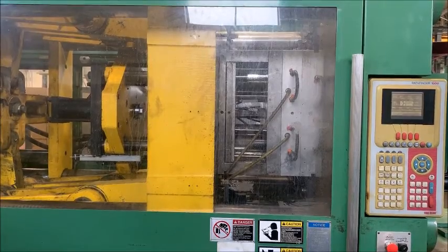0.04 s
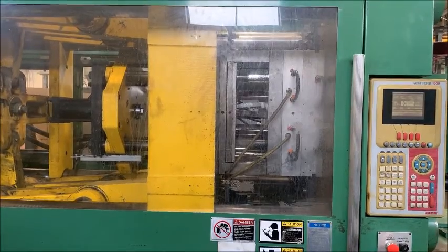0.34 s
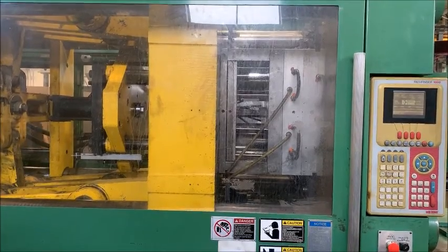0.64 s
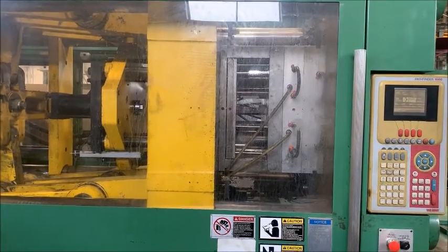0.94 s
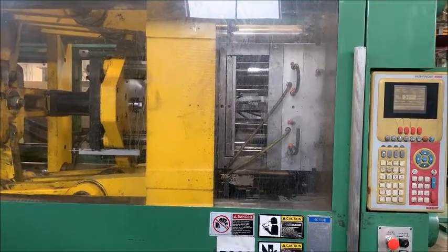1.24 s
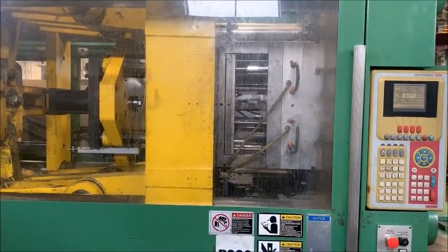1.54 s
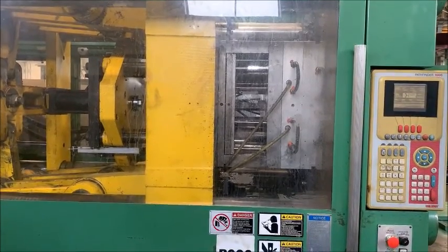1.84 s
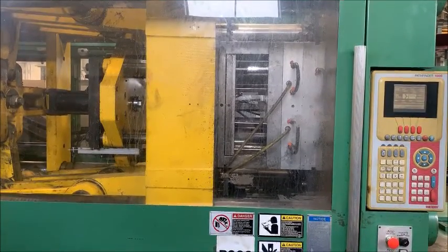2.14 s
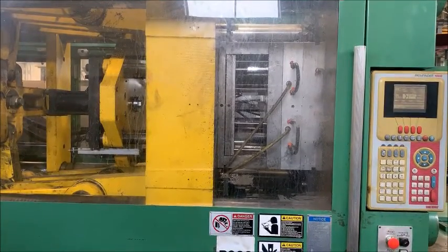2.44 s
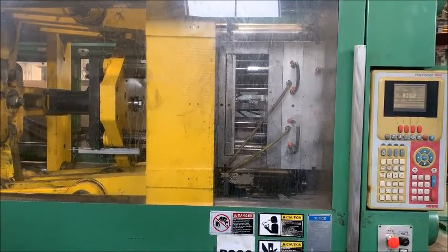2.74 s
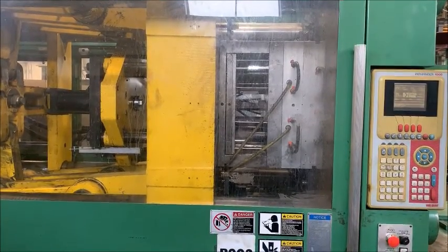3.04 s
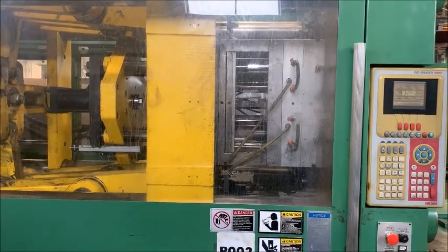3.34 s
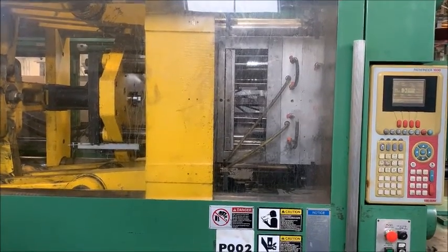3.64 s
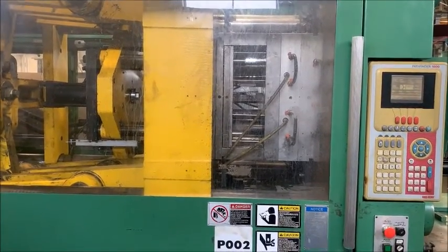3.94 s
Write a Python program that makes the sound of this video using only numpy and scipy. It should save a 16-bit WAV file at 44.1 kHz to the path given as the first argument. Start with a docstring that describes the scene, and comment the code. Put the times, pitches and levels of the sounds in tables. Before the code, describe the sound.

An injection moulding machine drones close by throughout, a low throbbing hum over rushing fans. A thin whistling air leak fades by 2 seconds. Light metal clacks come around 0.8, 2.4 and 3.4 seconds, among short air puffs and brief hollow groans. Faint squeaks and dull thuds sound in the hall near 1.9 seconds. From about 3 seconds a low whine surges, with more thuds towards the end.

```python
"""An injection moulding machine drones in a workshop hall, close to a pair of microphone ports.
Its hydraulic pump and motor beat against each other over a wash of fans and oil flow, while a thin
air leak whistles and dies away. Valves puff through a short tube, slides groan and squeak on narrow
resonances, steel parts clack and ring, and something heavy lands and booms in the hall."""
import sys
import numpy as np
from scipy import signal
from scipy.fft import irfft
from scipy.io import wavfile
from scipy.ndimage import uniform_filter1d

SR = 44100
rng = np.random.default_rng(int(sys.argv[2]) if len(sys.argv) > 2 else 0)


def transcribe(signal):
    """Save signal, clipped to [-1, 1], as a 16-bit WAV file at the path in sys.argv[1]."""
    frames = np.atleast_2d(signal).T
    limited = np.clip(frames, -1, 1)
    pcm = np.round(limited * 32767).astype(np.int16)
    wavfile.write(sys.argv[1], SR, pcm)


N = 176400
T = np.arange(N) / SR
EVENT_T = T[:SR]  # each short sound gets one second


def amp(db):
    """Decibels to gain."""
    return 10 ** (np.asarray(db) / 20)


def unit(x):
    """Scales to rms 1."""
    return x / np.sqrt(np.mean(abs(x) ** 2) + 1e-20)


def colour(points, hz):
    """Reads (Hz, value) points on a log-frequency axis."""
    f, value = np.transpose(points)
    return np.interp(np.log(hz + 1), np.log(f), value)


def level(points):
    """Gain over time from (s, dB) points."""
    return amp(np.interp(T, *np.transpose(points)))


def waver(rate_hz=6.7):
    """A slow random wander of level and phase, complex with rms 1."""
    z = rng.standard_normal(N) + 1j * rng.standard_normal(N)
    return unit(np.fft.ifft(z / (1 + (np.fft.fftfreq(N, 1 / SR) / rate_hz) ** 4)))


# How alike the two microphone ports sound. Each row: frequency in Hz, likeness from 0 to 1.
PORT_LIKENESS = [(60, .98), (130, .9), (280, .78), (550, .3), (1100, .25), (4000, .25), (6500, .5),
                 (8500, .93), (15000, .85)]
# Phase between the ports. Each row: frequency in Hz, lead of the left in radians.
PORT_LEAD = [(20, 0), (480, -.2), (1200, -2.5), (2400, -2.1), (4500, -1.2), (6500, -.6), (8600, -3.14),
             (10400, -6), (11600, -6.6), (13300, -9.4), (15200, -12.5)]

def noise(db_at, size=N):
    """Noise of a given spectrum as the two ports hear it, at rms 1."""
    hz = np.fft.rfftfreq(size, 1 / SR)
    left, other = rng.standard_normal((2, len(hz))) + 1j * rng.standard_normal((2, len(hz)))
    alike = colour(PORT_LIKENESS, hz)
    right = (alike * left + np.sqrt(1 - alike ** 2) * other) * np.exp(-1j * colour(PORT_LEAD, hz))
    return unit(irfft(np.array([left, right]) * amp(db_at(hz)), size))


def tone(hz, db, pan_db, unsteady, phase=None, phase_at_s=.215):
    """One machine tone at the two ports: a steady part and a wavering part."""
    phase = rng.random() if phase is None else phase
    turns, mean_hz = np.cumsum(hz * np.ones(N)) / SR, np.mean(hz)
    carrier = np.exp(2j * np.pi * (turns - np.interp(phase_at_s, T, turns) + phase))
    shared = 1 - .59 * (1 - colour(PORT_LIKENESS, mean_hz))
    drift = np.sqrt(shared) * waver() + np.sqrt(1 - shared) * np.array([waver(), waver()])
    envelope = np.sqrt(1 - unsteady ** 2) + unsteady * drift
    ports = unit(np.array([[amp(pan_db)], [np.exp(-1j * colour(PORT_LEAD, mean_hz))]]))
    return np.sqrt(2) * amp(db) * (ports * envelope * carrier).real


def orders(base_hz, table):
    """Tones at whole multiples of one rate."""
    return sum(tone(round(multiple) * base_hz, *row) for multiple, *row in table)


# Shaft tones. Each row: multiple of the shaft rate (rounded when played), level in dB,
# left over right in dB, unsteadiness from 0 to 1.
PUMP_ORDERS = [(7, -39.5, 30, 0.13), (9, -24.5, 1.5, 0.03), (11, -46.5, -16, 0.7), (14, -40.5, -1, 0),
               (15, -43, 6, 1), (16, -46, 4, 0.06), (18, -33, -2, 0.74), (20, -48, 13, 0.64),
               (24, -34.5, -6.5, 0.73), (36, -41.5, 36, 0.6), (60, -43.5, 22, 0.05), (71.5, -63, 13, 0.3)]
MOTOR_ORDERS = [(1, -34, -1.3, 0.34), (8, -43, 2.4, 0.49)]
# The motor sags under load. Each row: time in seconds, shaft rate in Hz.
MOTOR_SPEED = [(.5, 58.935), (.75, 59.031), (1.9, 59.013), (2.4, 58.963), (2.9, 58.876), (3.2, 59.113),
               (3.55, 59)]
# Swells of the motor tones and of the beating pair. Each row: time in seconds, gain in dB.
MOTOR_SWELL = [(0, 1), (1.4, -1.5), (2.05, 7), (2.6, 1), (3.0, -3), (3.5, 3), (4, 5.5)]
THROB_SWELL = [(0, -0.5), (1.9, -1), (2.4, 2), (2.9, 1), (3.35, -0.5), (4, 1.5)]

def pump_and_motor(pump_hz=19.967):
    """Two shafts drone; two close orders throb, faster when load slows the motor."""
    motor_hz = np.interp(T, *np.transpose(MOTOR_SPEED))
    phase = rng.random()  # shared, so the pair adds up at phase_at_s
    throb = tone(12 * pump_hz, db=-25, pan_db=-13.5, unsteady=.1, phase=phase)
    throb += tone(4 * motor_hz, db=-29.5, pan_db=-1.2, unsteady=.12, phase=phase)
    pump = orders(pump_hz, PUMP_ORDERS)
    motor = level(MOTOR_SWELL) * orders(motor_hz, MOTOR_ORDERS)
    return level(THROB_SWELL) * throb + pump + motor


# Oil whine. Each row: harmonic, dB against the swell, left over right in dB, unsteadiness from 0 to 1.
WHINE_ORDERS = [(1, -1.5, -0.5, 0.75), (2, -0.68, -0.5, 0.44)]
# Its swell. Each row: time in seconds, level in dB.
WHINE_SWELL = [(0, -37), (.7, -36), (.96, -31), (1.07, -35.5), (1.18, -28), (1.5, -35), (2.74, -40),
               (2.92, -23.5), (3.06, -27), (3.22, -26), (3.31, -33), (3.5, -28), (3.59, -30.5),
               (3.72, -22.5), (3.81, -34), (3.92, -23)]

def oil_whine(hz=268.9):
    """The oil whines in surges, on one pitch and its octave."""
    return level(WHINE_SWELL) * orders(hz, WHINE_ORDERS)


# Steady hums, one of them close to the whine's third harmonic. Each row: pitch in Hz, level in dB, left over
# right in dB, unsteadiness from 0 to 1.
STEADY_HUMS = [(64.75, -42.5, -2, 0.54), (76.3, -40.5, -2, 0.02), (804, -42.5, 17, 0.82),
               (1880, -48, 7, 0.55), (2393, -47, 7, 0.7)]

def steady_hums():
    """Further steady tones hum and whine, each on its own pitch; one rings close to the third harmonic of the
    oil whine."""
    return sum(tone(*row) for row in STEADY_HUMS)


# Fans and flow at the microphone. Each row: frequency in Hz, relative density in dB.
WASH_SPECTRUM = [(20, -20), (35, -7), (55, -6.5), (130, 0), (200, -0.5), (380, 2), (650, -3), (1000, -5),
                 (1500, -9), (2400, -11), (3500, -17), (5500, -25), (8000, -28), (11000, -32), (16000, -39)]
# Swell of their midrange. Each row: time in seconds, gain in dB.
MID_SWELL = [(0, 1), (.28, -2), (.37, 1), (.58, 0.5), (.84, 1.5), (1.08, -0.5), (1.4, -1), (1.7, 0.5),
             (2.2, -0.5), (2.48, 3), (2.85, -1), (3.2, 0), (3.55, 2.5), (3.85, 4), (4, 3)]

def wash(db=-25.5, mid_hz=885, mid_octaves=2.34):
    """Fans and oil flow: patchy noise whose midrange swells."""
    hz, t, spectra = signal.stft(noise(lambda f: colour(WASH_SPECTRUM, f)), SR, nperseg=1024, noverlap=768)
    speckle = rng.standard_normal(spectra.shape[1:])
    patches_db = unit(uniform_filter1d(uniform_filter1d(speckle, size=10, axis=0), size=16, axis=1))
    midrange = np.exp(-.5 * (np.log2((hz + 1) / mid_hz) / mid_octaves) ** 2)[:, None]
    spectra *= amp(patches_db + midrange * np.interp(t, *np.transpose(MID_SWELL)))
    return amp(db) * signal.istft(spectra, SR, nperseg=1024, noverlap=768)[1][:, :N]


# Hiss of the leak. Each row: frequency in Hz, relative density in dB.
LEAK_SPECTRUM = [(2000, -0.5), (4800, -4), (7500, -4), (10000, -5), (12000, -8), (16000, -23)]
# Its fade. Each row: time in seconds, level in dB.
LEAK_FADE = [(0, -39.5), (.6, -42), (1.3, -48), (2.1, -57), (4, -70)]
# Its resonances. Each row: starting pitch in Hz, half width in Hz, level in dB against the hiss.
LEAK_WHISTLES = [(4115, 16, -11), (5300, 26, -8.5), (10300, 110, -9)]

def leak():
    """Escaping air hisses and whistles as its pressure falls."""
    hiss = noise(lambda f: colour(LEAK_SPECTRUM, f))
    return level(LEAK_FADE) * (hiss + sum(whistle(*row) for row in LEAK_WHISTLES))


def whistle(hz, width_hz, db, sag_per_s=.011):
    """A breathy whistle that sinks in pitch by a small share each second."""
    sing = signal.hilbert(noise(lambda f: -10 * np.log10(1 + ((f - hz) / width_hz) ** 4)))
    return amp(db) * (sing * np.exp(-1j * np.pi * hz * sag_per_s * T ** 2)).real


# Air valves venting. Each row: start in seconds, level in dB.
PUFFS = [(0.02, -44), (.667, -41), (1.1225, -28), (2.268, -38.5), (2.4879, -30), (3.1323, -29),
         (3.782, -29.5), (3.89, -39)]
# Their hiss before the tube. Each row: frequency in Hz, relative density in dB.
PUFF_SPECTRUM = [(1500, 6), (3500, -6.5), (5000, -2.5), (7500, -1), (9500, 2), (11500, -2), (13000, -5),
                 (16000, -14)]

def puff(db, tube_hz=783, echo=.29, rise_s=.00098, hold_s=.019, t60=.35):
    """A valve pops open and vents through a short tube, whose resonances comb the hiss."""
    t = EVENT_T
    tube = lambda f: -20 * np.log10(abs(1 - echo * np.exp(2j * np.pi * f / tube_hz)))
    air = noise(lambda f: colour(PUFF_SPECTRUM, f) + tube(f), size=SR)
    pop_db = 5 * np.exp(-t / .004)
    return air * np.minimum(t / rise_s, 1) * amp(db + pop_db - 60 * np.maximum(t - hold_s, 0) / t60)


# Heavy slides. Each row: start in seconds, hold in seconds, pitch in Hz, level in dB.
GROANS = [(0.31, 0.12, 798, -28), (0.74, 0.093, 804.6, -32.5), (0.789, 0.14, 612, -31.5),
          (2.246, 0.056, 374, -28)]

def groan(hold_s, hz, db):
    """A heavy slide sings low and hollow, narrower and longer ringing than a squeak."""
    return squeak(hold_s, hz, db, width_hz=7.4, t60=.63)


# Metal parts striking. Each row: start in seconds, level in dB, treble tilt in dB per octave,
# ping in Hz, opening crack in dB against the crash.
CLACKS = [(.34, -37, -10, 1630, -6), (0.675, -34.5, 2, 3810, -8), (.792, -36, 6, 4750, -5),
          (0.8247, -30, -3, 4650, 2), (.838, -29, -7, 1625, -6), (2.28, -35, 6, 2700, -8),
          (2.385, -31, 2, 3860, -11), (2.4137, -25.5, 2.5, 4690, -3), (2.44, -33.5, 0, 2700, -6),
          (3.2921, -31.5, 6, 3940, -12), (3.4035, -26.5, 1.5, 3380, 6), (3.412, -26, -2, 2620, -1)]
# Their crash before the tilt. Each row: frequency in Hz, relative density in dB.
CLACK_SPECTRUM = [(300, -12), (900, 0), (2500, 4), (4500, 7), (6000, -4.5), (7600, -1), (9000, -8),
                  (16000, -20)]
# Modes of the steel. Each row: frequency in Hz, relative level in dB, seconds to fall 60 dB.
STEEL_MODES = [(1594, -5, 1), (2090, -5.5, 0.71), (2454, -0.5, 0.3), (2634, -1.5, 0.36), (3480, -4.5, 0.24),
               (3830, -4, .16), (4540, -11, 0.25), (6310, -11, 0.6), (7440, -9, 0.2)]

def clack(db, tilt_db, ping_hz, crack_db, crack_s=.0052, crash_t60=.13, ping_t60=.22, hall_t60=.58):
    """Steel meets steel: a bright crack, a crash, modes with one leading ping, and a duller hall tail."""
    t = EVENT_T
    shape = lambda f: colour(CLACK_SPECTRUM, f) + tilt_db * np.log2(f / 3000 + .1)
    crack = noise(lambda f: shape(f) + 1.5 * np.log2(f + 1), size=SR)
    crack *= amp(crack_db) * np.exp(-(t / crack_s) ** 2)
    crash = noise(shape, size=SR) * amp(-60 * t / crash_t60)
    ring = 0
    for hz, mode_db, t60 in [*STEEL_MODES, (ping_hz, 2, ping_t60)]:
        turns = hz * rng.uniform(1.0, 1.02) * t + rng.random((2, 1))  # each strike rings up to 2% sharp
        ring += amp(mode_db - 60 * t / t60) * np.sin(2 * np.pi * turns)
    hall = noise(lambda f: shape(f) - 3 * np.log2(f / 1000 + 1), size=SR)
    hall *= np.minimum(t / .031, 1) * amp(-60 * t / hall_t60)
    return amp(db) * np.minimum(t / .00052, 1) * (crack + crash + amp(-5) * ring + amp(-2.5) * hall)


# Dry slides. Each row: start in seconds, hold in seconds, pitch in Hz, level in dB.
SQUEAKS = [(1.820, 0.045, 4420, -38), (1.863, 0.045, 4240, -38.5), (1.935, 0.051, 4430, -43.5),
           (1.973, 0.035, 4260, -48)]

def squeak(hold_s, hz, db, width_hz=60, rise_s=.0084, t60=.26):
    """A dry slide sings briefly on a narrow resonance."""
    sing = noise(lambda f: -20 * np.log10(1 + ((f - hz) / width_hz) ** 2), size=SR)
    return sing * np.minimum(EVENT_T / rise_s, 1) * amp(db - 60 * np.maximum(EVENT_T - hold_s, 0) / t60)


# Heavy landings. Each row: start in seconds, level in dB.
THUDS = [(1.83, -17.5), (1.875, -22.5), (2.02, -24.5), (3.421, -21.5), (3.661, -24), (3.902, -22.5)]
# Their boom in the hall. Each row: frequency in Hz, relative density in dB.
THUD_SPECTRUM = [(30, -22), (70, -13), (125, 5.5), (170, -7), (300, -6), (500, -16), (2000, -47)]

def thud(db, rise_s=.03, t60=.67):
    """A heavy part lands and booms in the hall."""
    boom = noise(lambda f: colour(THUD_SPECTRUM, f), size=SR)
    return boom * np.minimum(EVENT_T / rise_s, 1) * amp(db - 60 * EVENT_T / t60)


def scene():
    """The machine from close by: its steady drone with the short sounds on top."""
    mix = pump_and_motor() + oil_whine() + steady_hums() + wash() + leak()
    events = (puff, PUFFS), (groan, GROANS), (clack, CLACKS), (squeak, SQUEAKS), (thud, THUDS)
    for source, table in events:
        for start_s, *row in table:
            start = round(start_s * SR)
            mix[:, start:start + SR] += source(*row)[:, :N - start]
    return mix


def record(dry):
    """The recorder's band limit cuts the top treble."""
    lowpass = signal.firwin(511, cutoff=15950, window=("kaiser", 9), fs=SR)
    return signal.oaconvolve(dry, lowpass[None], "same")


dry = scene()
out = record(dry)
transcribe(out)
```